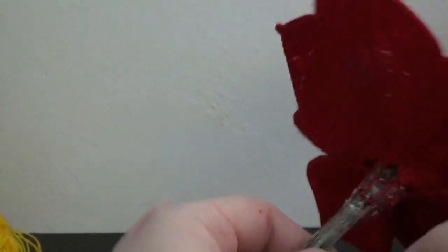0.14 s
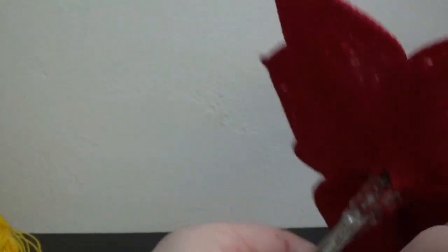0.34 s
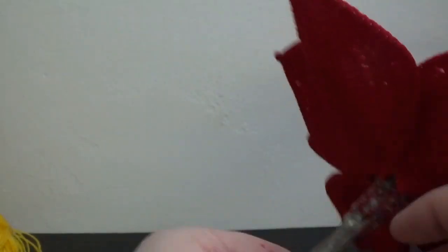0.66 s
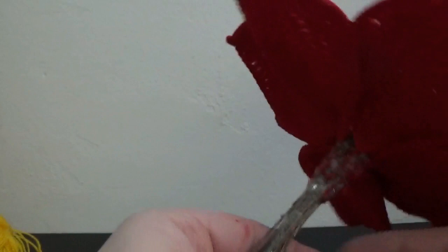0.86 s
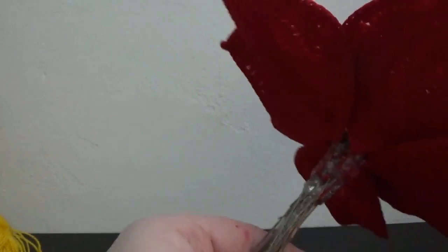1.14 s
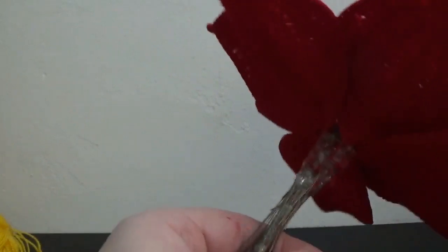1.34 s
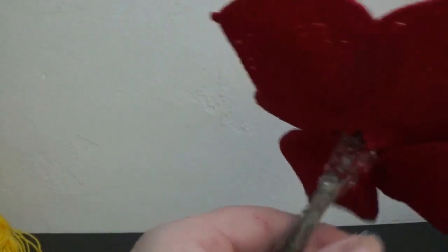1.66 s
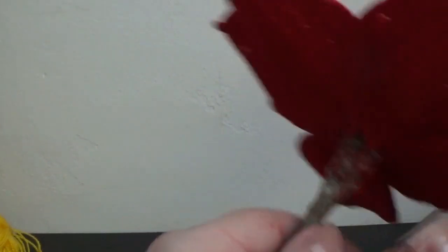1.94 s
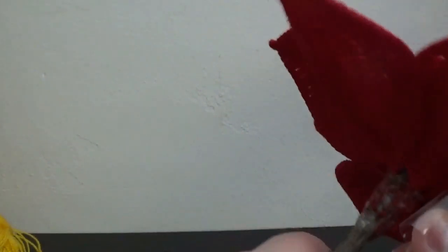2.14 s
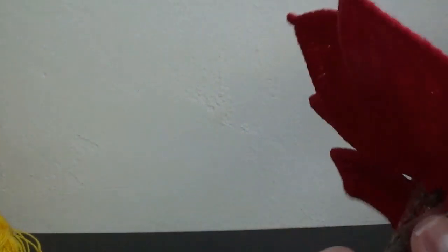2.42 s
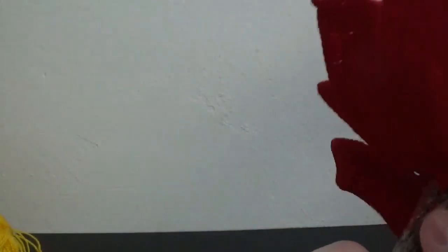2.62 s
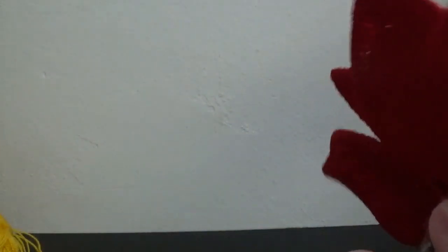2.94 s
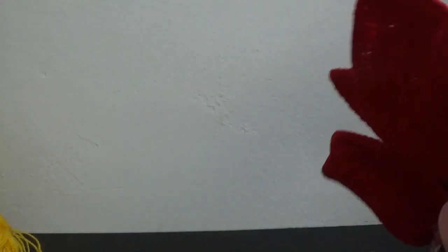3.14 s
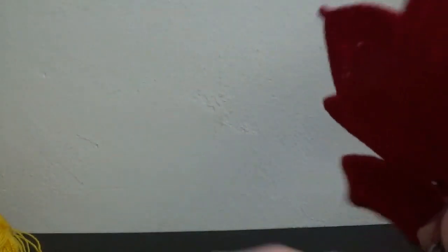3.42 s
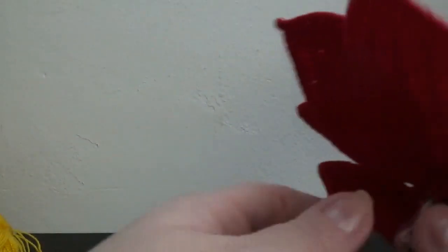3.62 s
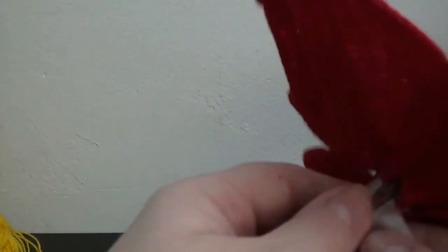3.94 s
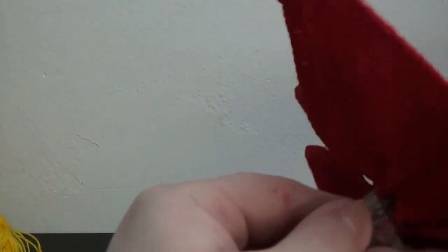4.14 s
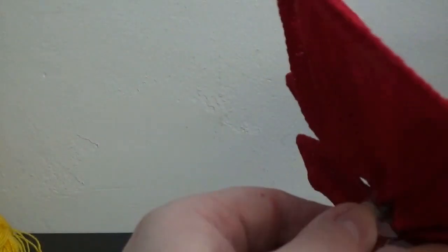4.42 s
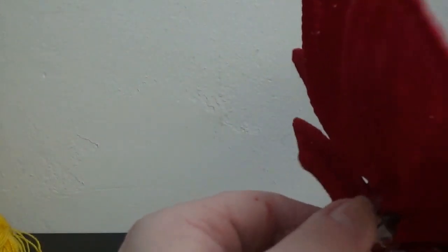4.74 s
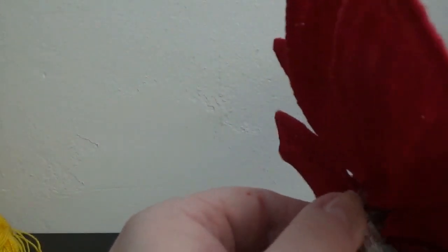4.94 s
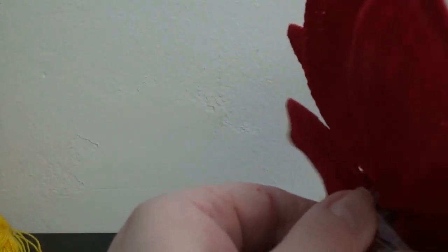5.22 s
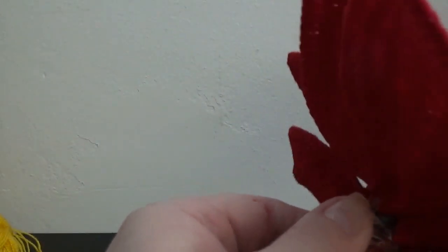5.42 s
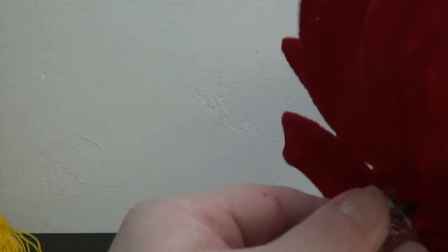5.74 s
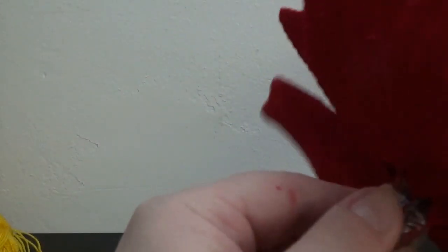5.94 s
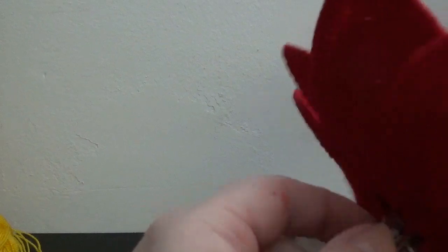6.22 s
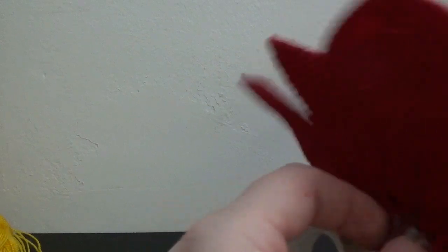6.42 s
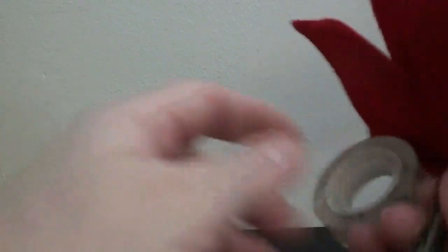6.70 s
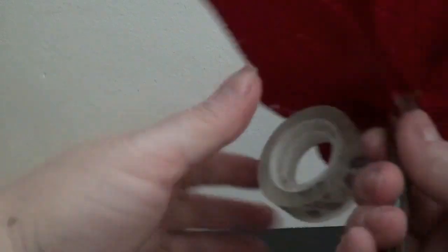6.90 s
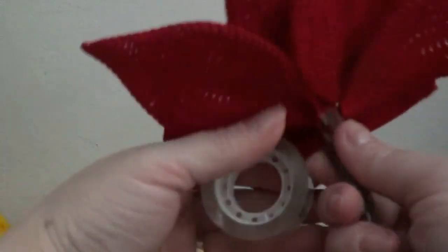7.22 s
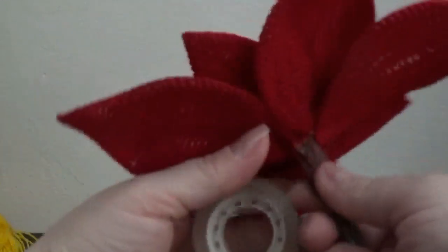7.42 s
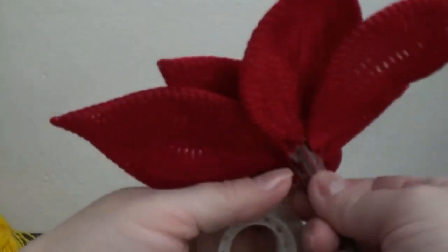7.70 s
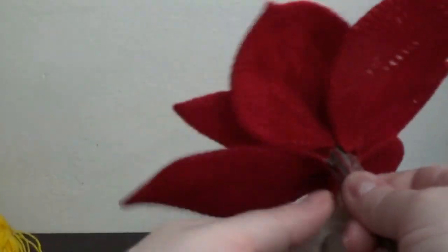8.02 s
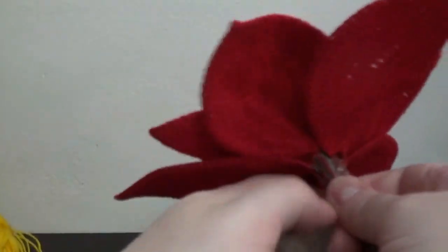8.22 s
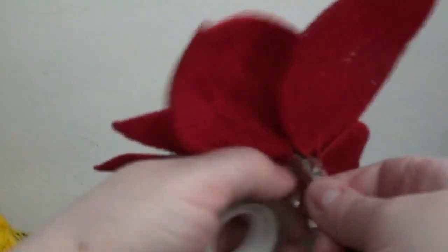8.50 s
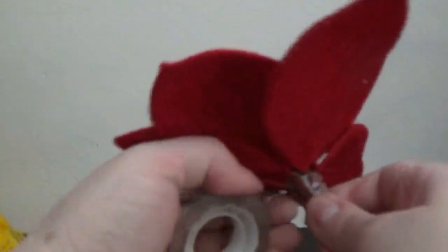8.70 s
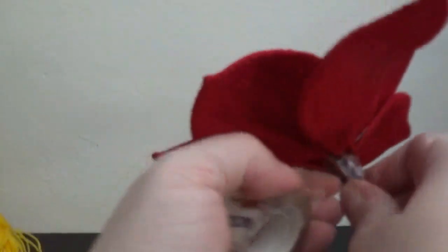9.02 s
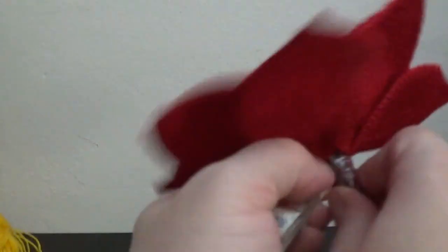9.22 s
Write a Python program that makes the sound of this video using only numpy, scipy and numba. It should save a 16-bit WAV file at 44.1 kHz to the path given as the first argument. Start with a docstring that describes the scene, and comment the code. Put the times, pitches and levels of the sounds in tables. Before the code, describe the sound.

Close, sharp cracks and ticks of sticky tape being unrolled and wrapped, with a few table knocks in a quiet room.

```python
"""Taping a bundle of wire stems

A table in a quiet room, the microphone of a small camera close to hands winding clear sticky tape.
The glue lets go in sharp cracks and flurries of tiny ticks; the film swishes under the fingers.
Stems and wrists knock and drag on the table top, and a forearm thumps it.
Mains hum, microphone hiss and a faint ticking in the camera lie underneath."""
import sys
import numpy as np
from scipy import signal
from scipy.fft import rfft, irfft, next_fast_len
from scipy.io import wavfile
from scipy.ndimage import uniform_filter1d
from numba import njit

SR = 44100
rng = np.random.default_rng(int(sys.argv[2]) if len(sys.argv) > 2 else 0)


def store_pcm(level_fs):
    """Save levels as 16-bit WAV."""
    pcm = np.round(np.clip(level_fs, -1, 1) * 32767).astype(np.int16)
    wavfile.write(sys.argv[1], SR, np.atleast_2d(pcm).T)


N = 412335

# sharp cracks of the film, and the bright snap of one stem knock:
# (time [s], level [dB], ring pitch [Hz], low part re level [dB])
SHARP_CRACKS = [(0.0911, -27.5, 4900, -9), (0.1787, -29, 10000, -21), (0.248, -23, 8500, -16),
                (0.3575, -25, 4500, -6), (0.4373, -29, 6560, -7), (0.5179, -11, 9600, -46),
                (0.521, -21.5, 9700, -6), (0.6761, -24, 6060, -5.5), (0.714, -31.5, 7240, -23),
                (0.816, -37, 5940, -22), (0.842, -36, 4300, -20), (1.0995, -31.5, 8400, -30),
                (1.1356, -19.5, 8300, -45), (1.153, -11, 8000, -37), (1.158, -14.5, 8500, -39),
                (1.169, -13.5, 7300, -21), (1.4304, -29, 3550, 0.5), (1.5082, -21.5, 3140, 0),
                (1.5255, -25, 7950, -8), (1.611, -26, 4400, -6), (1.7148, -21.5, 6040, -21),
                (1.7511, -17, 5230, 0.5), (1.775, -21.5, 9400, -16), (1.834, -29.5, 10000, -29),
                (1.8959, -28, 8400, -48), (1.953, -32.5, 8900, -37), (2.9541, -27, 7300, -9),
                (3.052, -22, 6860, -37), (3.076, -21, 7050, -4), (3.1797, -26.5, 7360, -14),
                (3.2019, -13.5, 7700, -35), (3.206, -14, 8700, -25), (3.2327, -9, 8200, -5),
                (3.2505, -16.5, 7740, -0.5), (3.2728, -9, 7700, -35), (3.357, -26.5, 3400, -15),
                (3.468, -21, 7000, -20), (3.8107, -26.5, 5700, -7), (3.8422, -23, 4300, -27),
                (3.8602, -20.5, 6100, -43), (3.8725, -18.5, 4270, -32), (3.8896, -13.5, 5570, -4.5),
                (3.8942, -16, 8800, -34), (3.901, -15.5, 4340, -34), (3.9312, -20, 3050, -11),
                (4.089, -13.5, 4970, -5.5), (4.1985, -9.5, 5700, -15.5), (4.358, -25.5, 5740, -25),
                (4.3876, -25.5, 6900, -29), (4.409, -27.5, 6760, -31), (4.508, -28.5, 5770, -27),
                (4.577, -26.5, 7100, -36), (4.711, -25.5, 3250, -25), (4.775, -12, 7040, -22),
                (4.824, -29.5, 8750, -10), (4.9538, -23.5, 3270, -5), (4.972, -25, 4400, -15),
                (4.9895, -5.5, 3650, -37), (4.9945, -24, 6000, -40), (5.0174, -7, 3280, -36),
                (5.0276, -7.5, 5500, -49), (5.062, -27, 4340, -23), (5.253, -25, 5760, -9),
                (5.3529, -25.5, 8200, -24), (5.5882, -11.5, 6900, -28), (5.5928, -3.5, 6100, -9),
                (5.833, -29, 9750, -1.5), (5.9712, -19, 10400, -44), (6.04, -24, 7300, -4.5),
                (6.059, -28, 6560, -15), (6.0729, -20, 9600, -16), (6.1016, -7, 7400, -9),
                (6.152, -12, 4630, -18), (6.204, -8, 7140, -4.5), (6.2152, -23, 6850, 4.5),
                (6.3674, -23, 6100, -10), (6.5153, -24, 6240, -5), (6.55, -20.5, 6260, -31),
                (6.586, -20.5, 6400, -30), (6.7313, -26.5, 6800, -15), (6.761, -10.5, 6500, -43),
                (7.0507, -27.5, 7500, -29), (7.0579, -25, 3850, -7), (7.1274, -28, 4130, -8),
                (7.352, -30, 3340, -19), (7.5098, -23.5, 5460, -9), (7.5993, -24, 8200, -35),
                (8.431, -22.5, 7800, -38), (8.4425, -18, 7360, -48), (8.465, -27, 7300, -31),
                (8.538, -4.5, 9200, -58), (8.588, -26.5, 4740, -43), (8.646, -20.5, 7300, -29),
                (8.7256, -5.5, 7400, -12), (8.919, -9, 8340, -20), (8.944, -9, 7700, -39),
                (9.0826, -34, 8700, -30), (9.152, -31.5, 6840, -42), (9.1854, -15, 6170, -11)]


def cracks(creep_s=0.003, creep_db=-16, tear_s=0.0043, tear_db=-7):
    """Glue lets go, or once a stem strikes: a dry snap among smaller ones, a brief ring, a low part."""
    s, db, hz, low_db = np.transpose(SHARP_CRACKS)[:, :, None]
    draws = rng.random((len(s), 6, 40)).transpose(1, 0, 2)
    jitter, detune, phase, in_band, snap_phase, lag = draws
    part = np.arange(40) // 8  # five snaps of eight rings: two creep ahead, the main one, two follow
    stage = [part < 2, part > 2]
    onset = s + 0.0006 + np.select(stage, [-creep_s, tear_s]) * lag[:, part] + 0.0003 * jitter
    part_db = np.select(stage, [creep_db, tear_db]) - 6 * np.abs(onset - s) / tear_s
    band_hz = 2200 + 9300 * (np.arange(40) % 8 + in_band) / 8  # one ring in each eighth of the treble
    near_db = -7 * np.abs(np.log2(band_hz / hz))  # loudest about the ring pitch
    snap = rings(onset, band_hz, 0.0022, undb(db + part_db + near_db - 3.5), snap_phase)
    main = onset[:, 16:19]
    ping = rings(main, hz * (1 + 0.24 * (detune[:, :3] - 0.5)), 0.004, undb(db - 8), phase[:, :3])
    low_hz = 900 + 1600 * (np.arange(3) + detune[:, 3:6]) / 3
    low = rings(main, low_hz, 0.0094, undb(db + low_db - 14.5), phase[:, 3:6])
    return butter_filter(ping + snap, 3, 2300, "high") + low  # a narrow strip radiates few lows


def peeling(idle_db=-67.5, trail_db=-32.5, trail_t60_s=0.095, patchy_db=4.5):
    """Level curves in dB for the ticks of peeling and for the swish, with threads trailing each crack."""
    # spurts of peeling: (start [s], end [s], level [dB])
    peels = [(0.09, 0.1, -51), (0.246, 0.256, -50), (0.338, 0.358, -50), (0.508, 0.524, -43.5),
             (0.656, 0.73, -58.5), (1.12, 1.17, -45.5), (1.63, 1.75, -47), (2.93, 3, -54.5),
             (3.075, 3.105, -49.5), (3.205, 3.27, -39), (3.804, 3.92, -52), (3.994, 4.22, -58),
             (4.67, 4.85, -59.5), (4.928, 5.02, -44.5), (5.27, 5.33, -52.5), (5.423, 5.6, -56.5),
             (5.565, 5.592, -41), (5.843, 5.863, -48.5), (6.036, 6.26, -49), (6.364, 6.5, -50.5),
             (6.48, 6.82, -52.5), (7.04, 7.28, -61), (7.281, 7.42, -54), (7.485, 7.505, -47),
             (7.695, 7.9, -60), (8.434, 10, -55.5), (8.89, 9.2, -50), (9.073, 9.06, -46)]
    # smooth swishes of the film, finger slides and the ringing tail after a crack:
    # (start [s], end [s], level [dB])
    swishes = [(0.33, 0.36, -52.5), (1.18, 1.24, -54.5), (1.63, 1.76, -50), (2.93, 3.1, -53),
               (3.2, 3.29, -47), (5.03, 5.07, -51), (5.07, 5.125, -58.5), (5.565, 5.59, -51),
               (6.48, 6.6, -64), (6.78, 6.95, -64), (7.48, 7.51, -56), (7.68, 8.03, -63), (8.49, 8.57, -51),
               (8.73, 8.87, -50), (8.92, 9.03, -51.5), (9.07, 9.13, -51), (9.235, 9.265, -52.5)]
    t = np.arange(0, N / SR, 1 / 500)
    s, crack_db = np.transpose(SHARP_CRACKS)[:2, :, None]
    trails = undb(crack_db + trail_db - 60 * np.abs(t - s) / trail_t60_s) * (t > s)
    ticks = swells(peels, t, rise_db_per_s=1000, fall_db_per_s=750) + undb(idle_db) ** 2
    grip = uniform_filter1d(rng.standard_normal(len(t)), size=9) * 3  # fingers press unevenly
    swish = swells(swishes, t, rise_db_per_s=892, fall_db_per_s=892) * undb(patchy_db * grip) ** 2
    swish += np.sum(trails ** 2, axis=0) + 1e-12
    return [np.interp(np.arange(N) / SR, t, 10 * np.log10(power)) for power in (ticks, swish)]


def crackle(db, t60_s, per_s, scatter_db, spread_oct):
    """Countless glue threads part: tiny ticks of unequal size, pitched about the last crack's ring."""
    # tone of the crackle, coloured by the microphone's resonances: (frequency [Hz], gain [dB])
    tone = [(700, -7.5), (2000, -8), (4300, -5), (5900, -1), (7500, -0.5), (9000, -1), (11200, -3)]
    when, rarity, phase = rng.random((int(per_s * N / SR), 3)).T
    s = when * N / SR
    crack_s, _, ring_hz, _ = np.transpose(SHARP_CRACKS)
    centre_hz = ring_hz[np.maximum(np.searchsorted(crack_s, s) - 1, 0)]
    hz = np.minimum(centre_hz * 2 ** (spread_oct * rng.standard_normal(len(s))), 12000)
    size = undb(-scatter_db * np.log(rarity + 0.0015))  # the offset caps the rare big ticks
    return level(colour(rings(s, hz, t60_s, size, phase), tone), db)


def taut_tape(db):
    """A pulled length of tape hums while taut: narrow bands of noise that follow the crackle's level."""
    # taut spans: (start [s], end [s], pitch [Hz], level re crackle [dB])
    spans = [(.343, 0.362, 1960, -2.5), (0.524, 0.526, 1950, -1.5), (2.93, 3.024, 1950, -9),
             (2.95, 3.285, 7480, -2), (3.2, 3.265, 2030, -4.5), (3.245, 3.285, 850, -12),
             (4.987, 5.004, 3460, 0), (5.021, 5.024, 3050, 2), (5.033, 5.177, 5270, 0.5)]
    t = np.arange(N) / SR
    noise = rng.standard_normal(N)
    hum = np.zeros(N)
    for start, end, hz, span_db in spans:
        band = butter_filter(noise, 1, [0.97 * hz, 1.006 * hz], "band")
        hum += level(band, span_db) * (t > start) * (t < end)
    return undb(db) * hum


def table_top():
    """Knocking stems and dragging hands ring the same wooden modes."""
    # modes of the table top: (frequency [Hz], level [dB], t60 [s])
    modes = [(154, -6, 0.099), (235, -8.5, 0.054), (304, -3.5, 0.033), (499, -1, 0.049), (831, 3, 0.053),
             (1525, 5.5, 0.014), (2100, 1, 0.024), (2680, 2, 0.019), (3900, -3, 0.018)]
    hz, mode_db, t60 = np.transpose(modes)
    return stem_knocks(hz, mode_db, t60) + hand_drag(hz, mode_db, t60)


def stem_knocks(hz, mode_db, t60):
    """The bundle lands on the table as three uneven contacts."""
    # landings: (time [s], level [dB], treble re level [dB])
    knocks = [(2.305, -31, -1), (3.466, -20.5, -0.5), (4.62, -37.5, 0.5), (4.737, -39.5, -10),
              (5.376, -37, 3), (6.378, -43, -9), (6.493, -38.5, 4), (7.983, -37, -5)]
    s, db, treble_db = np.transpose(knocks)[:, :, None, None]
    lag, phase, detune = rng.random((len(s), 3, 3, len(hz))).swapaxes(0, 1)
    tilt_db = treble_db * np.clip(np.log2(hz / 410), 0, 1)  # softer contact weakens the upper modes
    gain = undb(db + mode_db + tilt_db - 11.5)
    return rings(s + 0.007 * lag ** 2, hz * (1 + 0.14 * (detune - 0.5)), 0.88 * t60, gain, 0.31 * phase)


def hand_drag(hz, mode_db, t60, damping=0.35):
    """Skin sticks and slips on the wood, stirring mostly the middle modes, which the hand damps."""
    # drags over the table: (start [s], end [s], level [dB])
    drags = [(2.368, 2.41, -52), (3.099, 3.108, -54.5), (3.215, 3.302, -54), (3.461, 3.76, -49),
             (3.799, 3.925, -58.5), (4.703, 4.795, -60.5), (5.498, 5.607, -56), (6.334, 6.598, -60.5),
             (6.854, 6.932, -54.5), (7.774, 8.053, -60.5), (8.591, 8.805, -55), (9.002, 9.311, -61)]
    body = rings(0., hz, damping * t60, undb(mode_db - 7.5 * np.abs(np.log2(hz / 1180))), 0.)[:SR // 4]
    body /= np.sqrt(np.sum(body ** 2))
    t = np.arange(N) / SR
    pressure = sum(undb(db) * np.sin(np.pi * np.clip((t - start) / (end - start), 0, 1)) ** 0.24
                   for start, end, db in drags)
    stick_slip = uniform_filter1d(rng.standard_normal(N), size=600) * np.sqrt(600)
    grit = rng.standard_normal(N) * undb(3.5 * stick_slip) * pressure
    skin = butter_filter(grit, 2, [800, 4500], "band")
    return signal.fftconvolve(grit, body)[:N] + 0.14 * skin


def forearm_thumps():
    """A forearm drives the table's low modes with a soft push, then settles in smaller, uneven ones."""
    # low modes of the table: (frequency [Hz], level [dB], t60 [s])
    modes = [(104, 1, 0.078), (117.55, -14, 0.28), (169.5, -14, 0.11), (242.85, -14.5, 0.17),
             (274, -9.5, 0.12), (416, -3.5, 0.025), (543, -10.5, 0.027), (698, -11, 0.053),
             (1280, -11.5, 0.025)]
    # soft flesh lands: (time [s], level [dB])
    pushes = [(6.87, -33.5), (7.003, -14.5), (7.981, -37.5), (9.019, -46)]
    hz, mode_db, t60 = np.transpose(modes)
    s, db = np.transpose(pushes)[:, :, None, None]
    lag, detune, phase = rng.random((len(s), 3, 12, len(hz))).swapaxes(0, 1)
    first = rings(s + 0.001, hz, t60, undb(db + mode_db - 5), 0.)
    later = 0.11 * lag ** 1.5
    gain = undb(db + mode_db - 17 - 140 * later)
    settle = rings(s + 0.00283 + later, hz * (1 + 0.064 * (detune - 0.5)), 0.54 * t60, gain, phase)
    return uniform_filter1d(uniform_filter1d(first + settle, size=10), size=10)  # softens the attack


def room(x, t60_s=0.17, mid_db=-14, width=0.54):
    """Diffuse echoes reach the microphone duller and, above the bass, partly unlike left and right."""
    t = np.arange(SR // 2) / SR
    fade = np.exp(-np.log(1000) * t / t60_s) * (1 - np.exp(-t / 0.00011))
    mid, side = rng.standard_normal((2, len(t)))
    mid = colour(mid, [(100, 1), (400, 7), (3000, -0.5), (11000, -5.5)]) * fade
    side = colour(side, [(60, -9), (1000, 4.5), (11000, 0)]) * fade
    gain = undb(mid_db) / np.sqrt(np.sum(mid ** 2))
    return np.array([signal.fftconvolve(x, gain * (mid + k * width * side))[:N] for k in (1, -1)])


def mains_hum():
    """The mains and its harmonics hum steadily in the centre."""
    # hum lines: (frequency [Hz], rms level [dB])
    lines = [(50, -66), (100, -75.5), (150, -71), (250, -77.5)]
    t = np.arange(N) / SR
    return sum(undb(db) * np.sqrt(2) * np.sin(2 * np.pi * (hz * t + rng.random())) for hz, db in lines)


def microphone_hiss(mid_db=-62, side_db=-65):
    """The microphone's own noise, spread between left and right."""
    # tone of the hiss, mid and side: (frequency [Hz], gain [dB])
    mid_tone = [(15, -52), (25, -13), (58, -5), (75, -11), (155, -9), (286, -10.5), (587, -14.5),
                (1640, -20.5), (2600, -19), (3030, -21), (10400, -25.5), (11500, -55), (15000, -90)]
    side_tone = [(25, -27), (239, -14), (1370, -17), (8030, -30), (11500, -32), (15000, -90)]
    mid, side = rng.standard_normal((2, N))
    mid = level(colour(mid, mid_tone), mid_db)
    side = level(colour(side, side_tone), side_db)
    return np.array([mid + side, mid - side])


def camera_ticking(per_s=25, drop_at_s=3.3):
    """Something in the camera ticks faintly, weak and strong in turn, quieter after a few seconds."""
    s = np.arange(0.027, N / SR, 1 / per_s)[:, None]
    strong = np.arange(len(s))[:, None] % 2
    db = -64 + 5 * rng.random((len(s), 2)) + 6 * strong - 10 * (s > drop_at_s)
    return rings(s, hz=[2590, 2850], t60=[0.07, 0.025], gain=undb(db + [-5, 0]), turn=0.)


def undb(db):
    """Decibels to amplitude."""
    return 10 ** (np.asarray(db) / 20)


def level(x, db):
    """Scale to unit rms, then by a gain in dB."""
    return x * undb(db) / np.sqrt(np.mean(x ** 2))


def butter_filter(x, order, hz, kind):
    """Filter with a flat passband."""
    return signal.sosfilt(signal.butter(order, hz, kind, fs=SR, output="sos"), x)


def colour(x, shape):
    """Filter by (frequency [Hz], gain [dB]) points."""
    hz, db = np.transpose(shape)
    size = next_fast_len(len(x))
    f = np.maximum(np.arange(size // 2 + 1) * SR / size, 1)
    return irfft(rfft(x, size) * undb(np.interp(np.log(f), np.log(hz), db)), size)[:len(x)]


def swells(events, t, rise_db_per_s, fall_db_per_s):
    """Summed power of events that swell, hold and die away."""
    start, end, db = np.transpose(events)[:, :, None]
    db = db - rise_db_per_s * np.maximum(start - t, 0) - fall_db_per_s * np.maximum(t - end, 0)
    return np.sum(undb(db) ** 2, axis=0)


@njit
def sum_sines(start, pole, size, length, n):
    """Sum of damped sines, one for each start sample."""
    out = np.zeros(n)
    for k in range(len(start)):
        z = size[k]
        for i in range(start[k], min(start[k] + length[k], n)):
            out[i] += z.imag
            z *= pole[k]
    return out


def rings(s, hz, t60, gain, turn):
    """Damped sines from arrays of time, pitch, decay, size and start phase in turns."""
    t60 = np.maximum(t60, 1e-4)
    s, hz, t60, gain, turn = (a.ravel() for a in np.broadcast_arrays(s, hz, t60, gain, turn))
    pole = np.exp(2j * np.pi * hz / SR - np.log(1000) / (t60 * SR))
    size = gain * np.exp(2j * np.pi * turn)
    return sum_sines((s * SR).astype(np.int64), pole, size, (t60 * SR).astype(np.int64), N)


def scene(tape_right_db=1.64):
    """Tape close up and a little to the right, the table in the centre, the quiet room behind."""
    peel_db, swish_db = peeling()
    tape = cracks() + crackle(peel_db, t60_s=0.002, per_s=7000, scatter_db=6, spread_oct=0.86)
    tape += taut_tape(np.maximum(peel_db, swish_db))
    tape += crackle(swish_db, t60_s=0.0035, per_s=4000, scatter_db=2.5, spread_oct=0.55)
    tape = butter_filter(tape, 2, 600, "high")  # small things radiate no deep bass
    wood = butter_filter(table_top() + forearm_thumps(), 5, 90, "high")
    pan = undb(np.array([[-0.5], [0.5]]) * tape_right_db)
    return tape * pan + wood + room(tape + wood) + mains_hum() + microphone_hiss() + camera_ticking()


def record(dry, edge_hz=11000, top_hz=12145):
    """The microphone drops off sharply at its treble edge, then the top is cut."""
    edge = signal.ellip(6, 0.5, 28, edge_hz, fs=SR, output="sos")
    return butter_filter(signal.sosfilt(edge, dry), 12, top_hz, "low")


dry = scene()
out = record(dry)
store_pcm(out)
```